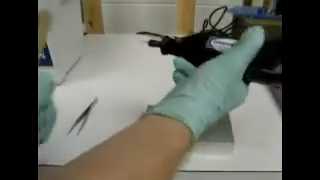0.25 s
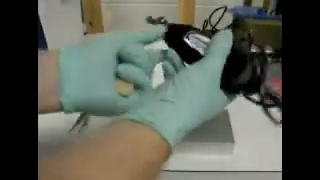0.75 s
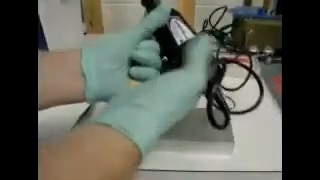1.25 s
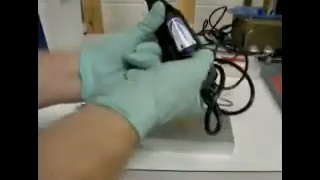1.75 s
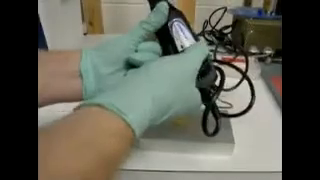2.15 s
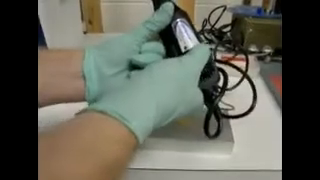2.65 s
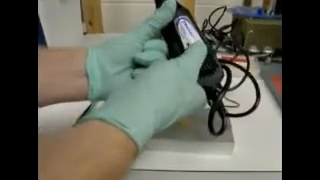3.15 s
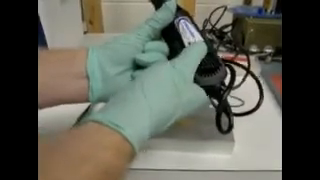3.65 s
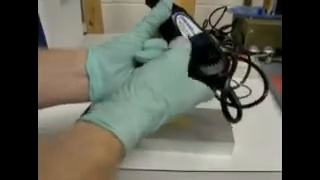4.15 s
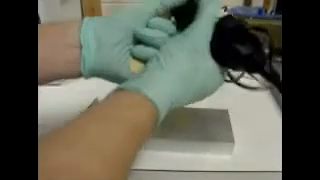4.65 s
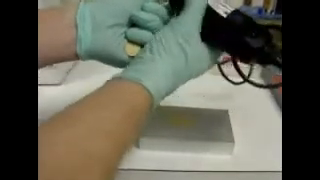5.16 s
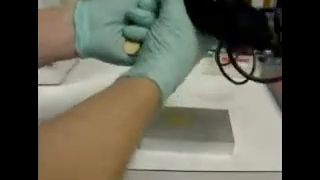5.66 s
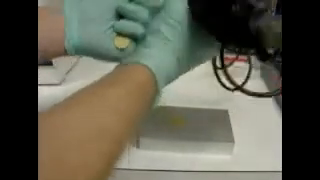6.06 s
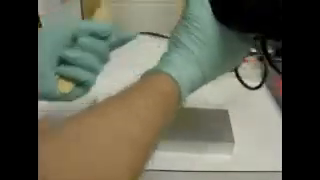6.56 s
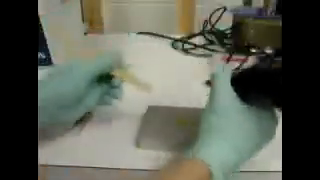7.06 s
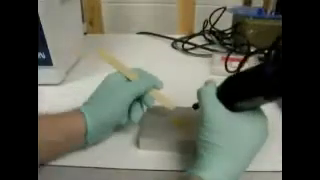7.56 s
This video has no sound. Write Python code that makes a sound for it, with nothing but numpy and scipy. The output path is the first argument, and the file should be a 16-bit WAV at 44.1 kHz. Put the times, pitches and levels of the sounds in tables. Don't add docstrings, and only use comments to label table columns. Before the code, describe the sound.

In a quiet ventilated lab, gloves creak, a switch clicks, and a small electric motor creeps up before screaming to full speed, its hiss shifting.

```python
import sys
import numpy as np
from scipy import signal
from scipy.fft import rfft, irfft, next_fast_len
from scipy.io import wavfile
from scipy.ndimage import uniform_filter1d, map_coordinates

SR = 44100
rng = np.random.default_rng(int(sys.argv[2]) if len(sys.argv) > 2 else 0)


def undo_db(level):
    steps = np.asarray(level, float) / 20
    return 10 ** steps


def digitize_waveform(pressure):
    field = np.atleast_2d(pressure).T
    bounded = np.clip(field, -1, 1)
    quanta = np.round(bounded * 32767).astype(np.int16)
    wavfile.write(sys.argv[1], SR, quanta)


N = 343980
T = np.arange(N) / SR
DIAL_S, MAINS_RIPPLE_HZ = 3.0578, 120
FLUTTER_DB = 1.7


def unit(x):
    return x / np.sqrt(np.mean(x ** 2) + 1e-20)


def along(points, hz):
    f, v = np.transpose(points)
    return np.interp(np.log(hz + 1), np.log(f + 1), v)


def curves(rows):
    s, *cols = np.transpose(rows)
    return [np.interp(T, s, c) for c in cols]


def wobble(rate):
    coarse = T[::64]
    knots = rng.standard_normal(int(N * rate / SR) + 4)
    return np.interp(T, coarse, map_coordinates(knots, [coarse * rate]))


def swell(middle, half):
    return np.exp(-((T - middle) / half) ** 2)


def rise(start, lag):
    return 1 - np.exp(-np.maximum(T - start, 0) / lag)


def ramp(start, length):
    return np.clip((T - start) / length, 0, 1)


def filtered(x, response):
    m = next_fast_len(len(x) + SR // 2)
    return irfft(rfft(x, m) * response(np.fft.rfftfreq(m, 1 / SR)), m)[:len(x)]


def resonance(f, hz, width):
    return 1j * f * width / (hz * hz - f * f + 1j * f * width)


def body(modes, floor):
    return lambda f: floor + sum((-1) ** k * undo_db(db) * resonance(f, c, w)
                                 for k, (c, w, db) in enumerate(modes))


def open_top(spectrum):
    return lambda hz: undo_db(along(spectrum[:-2], hz))


def patchy(patchy_db, grit_db):
    grit = np.repeat(rng.exponential(size=N // 32 + 1), 32)[:N]
    grains = rng.standard_normal(N) * undo_db(grit_db * grit)
    z = signal.stft(grains, nperseg=512)[2]

    def blur(bins, frames):
        smeared = uniform_filter1d(rng.standard_normal(z.shape), bins, 0)
        return unit(uniform_filter1d(smeared, frames, 1))

    field = blur(bins=8, frames=12) + 1.2 * blur(bins=5, frames=60)
    return signal.istft(z * undo_db(patchy_db * unit(field)), nperseg=512)[1][:N]


def ventilation():
    # (time [s], level [dB])
    room_level = [
        (0.0, -62),
        (.46, -65),
        (3.06, -63.5),
        (3.2, -67.5),
        (4.1, -74.5),
        (4.4, -70.5),
        (5.45, -71.5),
        (6.0, -77),
        (6.12, -73.5),
        (7.8, -72.5),
    ]
    # (frequency [Hz], density [dB per Hz])
    room_colour = [(8.8, -56.5), (15, -2), (54, 2.5), (152, -8.5), (187, -8.5), (387, -10.5), (618, -19),
                   (844, -14.5), (1040, -20), (1250, -23), (1990, -23.5), (2150, -25.5), (7500, -45.5),
                   (9750, -78), (16500, -120)]
    # (frequency [Hz], level under the rumble [dB])
    hum_tones = [(120, -8), (193, -10)]
    rumble = unit(filtered(rng.standard_normal(N), open_top(room_colour)))
    hum = sum(undo_db(db + 0.97 * wobble(3.6)) * np.sin(2 * np.pi * hz * T + .5 * wobble(13))
              for hz, db in hum_tones)
    return undo_db(curves(room_level)[0] - 0.66) * (rumble + hum)


def gloves():
    # (middle [s], half length [s], bright level [dB], dull level [dB])
    strokes = [(0.224, 0.044, -68, -73), (.27, 0.07, -60, -79), (0.5, 0.044, -57, -69.5),
               (0.41, 0.044, -65.5, -80), (0.669, 0.06, -61.5, -83), (0.932, 0.016, -64, -63),
               (0.905, 0.093, -64.5, -92), (1.064, 0.11, -62.5, -78), (1.306, 0.041, -67.5, -81),
               (1.381, 0.011, -68, -82), (1.591, 0.054, -66, -70.5), (1.818, 0.051, -69.5, -85)]
    # (frequency [Hz], density [dB per Hz])
    bright_colour = [(1800, -53), (3000, -15.5), (4600, -6), (5600, -3.5), (6600, -1.5), (7300, -4.5),
                     (7800, -7), (10000, -40), (17000, -120)]
    dull_colour = [(600, -40), (1000, -8), (2000, -4), (3200, -1.5), (4500, -5), (6000, -25), (9000, -60)]
    shifting_db, resting_db, dull_db = -74, -78, -82
    fidget = undo_db(np.interp(T, [1.3, 2.05], [shifting_db, resting_db])) * rise(-0.034, 0.085)
    bright_gain = fidget + sum(undo_db(db) * swell(s, half) for s, half, db, _ in strokes)
    dull_gain = undo_db(dull_db) + sum(undo_db(db) * swell(s, half) for s, half, _, db in strokes)
    bright = unit(filtered(patchy(patchy_db=1.5, grit_db=1.5), open_top(bright_colour)))
    dull = unit(filtered(patchy(patchy_db=.8, grit_db=1.5), lambda f: undo_db(along(dull_colour, f))))
    return (bright_gain * bright + dull_gain * dull) * np.clip((2.65 - T) / 0.071, 0, 1)


def clicks():
    # (time [s], peak [dB], centre [Hz], decay t60 [s])
    snap_events = [(.2013, -48, 7000, .003), (.2195, -42, 5600, .01), (.2213, -35, 5600, .006),
                   (.2590, -30, 6000, .005), (.2603, -32, 6300, .007), (.2626, -31, 5200, .005),
                   (.2646, -33, 6600, .007), (.2654, -32, 2400, .005), (.3308, -53, 2300, .005),
                   (1.3485, -51, 3800, .008), (1.385, -57, 5000, .008), (1.518, -59, 5500, .008),
                   (2.5137, -58, 7500, .004), (2.5352, -36, 7000, .01), (2.5365, -46, 3500, .008),
                   (3.0772, -26, 6500, .007)]
    # (frequency [Hz], width [Hz], level [dB])
    switch_modes = [(1180, 260, -12), (3350, 290, -2.5), (5400, 1100, -2.5), (6800, 640, 3.5)]
    switch_s, switch_db = 2.5303, -24
    out, t = np.zeros(N), np.arange(SR // 10) / SR

    def place(sound, s, db):
        out[round(s * SR):][:len(t)] += undo_db(db) * sound / np.abs(sound).max()

    for s, db, hz, t60 in snap_events:
        puff = rng.standard_normal(len(t)) * undo_db(-60 * t / max(t60, .003)) * (1 - np.exp(-t / 0.00046))
        puff = filtered(puff, lambda f: resonance(f, hz, .3 * hz) ** 2 + .2 * resonance(f, hz, 1.3 * hz))
        place(puff, s, db)
    crack = undo_db(-60 * t / 0.0049) * (1 - np.exp(-(t / 0.001) ** 3))
    rattle = undo_db(-36 - 60 * t / 0.15) * (t > .0015)
    noise = (crack + rattle) * rng.standard_normal(len(t))
    place(filtered(noise, body(switch_modes, floor=0.04)), switch_s, switch_db)
    return out


def lab(x):
    # (frequency [Hz], t60 [s])
    decay = [(300, 0.11), (3000, 0.12), (8000, 0.082)]
    hz, t, z = signal.stft(rng.standard_normal(SR // 3), SR, nperseg=256)
    tail = signal.istft(z * undo_db(-60 * t / along(decay, hz)[:, None]), SR, nperseg=256)[1]
    return signal.fftconvolve(np.pad(x, (150, 0)), tail / np.linalg.norm(tail))[:N]


def speed():
    start_s, creep_hz, creep_lag_s = 2.5464, 206.8, .3447
    kick_hz, kick_lag_s = 139.5, .0973
    climb_hz, climb_lag_s, warm_hz_per_s = 175.92, .4947, 8.639
    climb = kick_hz * rise(DIAL_S, kick_lag_s) + climb_hz * rise(DIAL_S, climb_lag_s)
    climb += warm_hz_per_s * np.maximum(T - DIAL_S, 0)
    return uniform_filter1d(creep_hz * rise(start_s, creep_lag_s) + climb, SR // 80)


def ripple():
    chopped = 1 - rise(DIAL_S - .01, .04)

    def depth(low_db, dial_db, speed_db, lag_s):
        return np.where(T < DIAL_S, low_db, dial_db + (speed_db - dial_db) * rise(DIAL_S, lag_s))

    tone_db = depth(11, 11, 2.2, 1.6)
    noise_db = depth(6.5, 2.5, .35, .3)
    cycle = (T * MAINS_RIPPLE_HZ - .86) % 1
    burst = 2 * np.exp(-cycle / .25) * (1 - np.exp(-cycle / .015)) - 1
    throb = np.cos(2 * np.pi * (cycle + 0.2))
    shape = chopped * burst + (1 - chopped) * throb
    cycle_len = round(SR / MAINS_RIPPLE_HZ)

    def even(gain):
        return gain / np.sqrt(uniform_filter1d(gain * gain, cycle_len * 2))

    drag = tone_db * .0006 * np.sin(2 * np.pi * (cycle + .2))
    return even(undo_db(tone_db * shape)), even(undo_db(noise_db * shape)), drag


def shaft_tone(turns, order, shift=0):
    angle = order * (turns + shift + 0.01 * wobble(25))
    return np.sqrt(2) * np.sin(2 * np.pi * angle + 7 * rng.random())


def slot_tones(rate, turns, octaves, gain, drag, close_db, turn_db, aim_db):
    # (multiple of shaft, level at running current [dB], added by chopped current [dB])
    slot_orders = [(8, -58, -8), (16, -57, 1), (24, -61, 6), (32, -72, 15)]
    # (frequency [Hz], width [Hz], level [dB])
    slot_path = [(2420, 570, -0.2), (3340, 180, -1.7), (4700, 980, -1.5), (6060, 210, -2.5),
                 (6650, 280, -1.5)]
    surging = ramp(3.05, .01)
    surge_db = 17.5 * (1 - rise(DIAL_S, 0.56))
    hands_db = (1.3 * close_db - 0.4 * turn_db) * rise(2.9, .3)
    current_db = surging * (surge_db + hands_db + aim_db)
    current_db += (1 - surging) * 7 * octaves

    def path(f):
        power = sum(np.abs(undo_db(db) * resonance(f, c, w)) ** 2 for c, w, db in slot_path)
        return np.sqrt(.12 ** 2 + power) / (1 + (f / 6940) ** 30) / (1 + (1900 / (f + 1)) ** 9)

    whine = np.zeros(N)
    for order, db, chop_db in slot_orders:
        level = undo_db(db + (1 - surging) * chop_db + current_db + FLUTTER_DB * wobble(40))
        casing_gain = np.interp(T, T[::64], path(order * rate[::64]))
        whine += level * casing_gain * gain * shaft_tone(turns, order, drag)
    return whine


def fan_blades(rate, turns):
    vent_hz, hz = 5900, 18 * rate
    vents = 1 / (1 + (vent_hz / (hz + 1)) ** 14) / (1 + (hz / 8600) ** 50)
    return undo_db(-45 + FLUTTER_DB * wobble(40)) * vents * shaft_tone(turns, 18)


def barrel(rate, turns, close_db, turn_db, aim_db):
    level = undo_db(-57 + aim_db + 2.7 * close_db - 1.0 * turn_db + 1.2 * wobble(14))
    return level * np.abs(resonance(3 * rate, 1560, 500)) * shaft_tone(turns, 3)


def brushes_and_air(turns, octaves, full, noise_gain, close_db, turn_db):
    # (frequency [Hz], density [dB per Hz])
    air_colour = [(150, -60.5), (250, -27.5), (699, -19), (1100, -8.5), (1330, -11), (1490, -7),
                  (1620, -2.5), (2070, -8.5), (2220, -9.5), (2490, -11), (2840, -10), (4000, -14.5),
                  (5240, -8.5), (6490, -2.5), (7600, -6.5), (9880, -37), (16700, -120)]
    # (frequency [Hz], width [Hz], level [dB])
    casing = [(1190, 130, -7.5), (2500, 370, 3.5), (3450, 88, 2.5), (4830, 170, -19.5), (6400, 200, 1),
              (7300, 260, -2)]
    # (upper edge [Hz], level [dB], share of closeness [dB/dB], share of turn [dB/dB])
    zones = [(2040, 0.57, 1.64, -0.55), (5400, 1.6, 0.71, 1.4), (22100, -0.1, 0.59, -0.059)]
    rub = patchy(patchy_db=1.68, grit_db=0.5) * undo_db(0.74 * np.cos(2 * np.pi * turns)) * noise_gain
    firings = np.diff(np.floor(T * MAINS_RIPPLE_HZ - .87), prepend=-1) > 0
    kicks = firings * undo_db(1.5 * rng.standard_normal(N))
    creeping = unit(filtered(rub, body(casing, floor=0.52)))
    creeping += undo_db(-15) * unit(filtered(kicks, body(casing, floor=0.55)))
    creeping = unit(filtered(creeping, lambda f: resonance(f, 3670, 10000) ** 2))
    air = (1 - full) * undo_db(-50 + 7.5 * octaves) * creeping
    source, below = unit(filtered(rub, open_top(air_colour))), 0
    for edge_hz, db, near, turned in zones:
        upto = filtered(source, lambda f: np.clip(np.log(edge_hz / (f + 1)) / 0.053 + .5, 0, 1))
        air += full * undo_db(-44 + db + near * close_db + turned * turn_db) * (upto - below)
        below = upto
    return air


def faint_orders(turns):
    # (multiple of shaft, middle [s], half length [s], level [dB])
    appearances = [(1, 3.36, .1, -61), (1, 4.15, .6, -72), (1, 6.55, .35, -78), (1, 7.4, .55, -71),
                   (18, 2.75, .06, -71), (9, 6.2, .12, -68), (9, 6.7, .2, -61), (9, 7.15, .25, -59.5),
                   (9, 7.6, .2, -64), (2, 4.75, 0.8, -68), (2, 6.85, 1, -71), (10, 4.36, 0.15, -61),
                   (12, 7.4, .3, -67), (12, 6.5, 0.56, -61), (4, 7.2, .25, -72), (10, 6.2, .3, -70),
                   (6, 7.3, 0.46, -66)]
    out = np.zeros(N)
    for order in sorted({row[0] for row in appearances}):
        gain = sum(undo_db(db) * swell(s, half) for k, s, half, db in appearances if k == order)
        out += gain * undo_db(FLUTTER_DB * wobble(14)) * shaft_tone(turns, order)
    return out


def cavities():
    # (middle [s], half length [s], frequency [Hz], width [Hz], level [dB])
    openings = [
        (3.328, 0.058, 1760, 247, -72),
        (4.353, 0.17, 6400, 714, -55),
        (5.411, 0.36, 6550, 700, -48.5),
        (6.202, 0.13, 6500, 590, -55),
        (7.1, 0.12, 6880, 610, -53.5),
        (7.15, 0.66, 1193, 302, -63),
        (7.5, 0.11, 7350, 795, -51),
        (7.68, 0.22, 2500, 350, -59.5),
        (7.483, 0.11, 5400, 910, -52.5),
    ]
    draught = patchy(patchy_db=-1.5, grit_db=1.5)
    return sum(undo_db(db) * swell(s, half) * unit(filtered(draught, lambda f: resonance(f, hz, w) ** 2))
               for s, half, hz, w, db in openings)


def motor():
    # (time [s], closeness [dB], vents turned to the camera [dB])
    grip = [(3.12, -2, 3), (3.2, -0.5, -0.5), (3.36, 2, 0.5), (3.52, -3, -2.5), (4.07, -0.5, -1.5),
            (4.4, 4, 1), (4.51, 1.3, 1.2), (4.62, 2.5, 1.5), (5.4, 1.5, 0), (5.78, 0, -0.5),
            (5.94, -5, -3.5), (6.05, 0.4, -.6), (6.27, 1.5, -0.1), (6.45, -1, -0.7), (7.1, 0.6, 0.8),
            (7.28, -2, -0.5), (7.68, -2, 1.5), (7.8, -0.5, 3)]
    # (middle [s], half length [s], slot tones [dB], third order [dB])
    swings = [
        (4.305, 0.18, 0, -2.5),
        (5.457, 0.29, 8, 0.6),
        (5.93, 0.3, 3.5, 0),
        (6.6, 0.092, 0.5, -3.5),
        (7.28, 0.11, -3, -11),
        (7.747, 0.13, -5, -1),
    ]
    rate = speed()
    turns = np.cumsum(rate) / SR
    slot_gain, noise_gain, drag = ripple()
    close_db, turn_db = curves(grip)
    aim_slot_db, aim_third_db = sum(swell(s, half) * np.array(db)[:, None] for s, half, *db in swings)
    running, full = ramp(2.55, 0.024), ramp(3.05, .03)
    octaves = np.log2((rate + 1) / 160)
    tones = slot_tones(rate, turns, octaves, slot_gain, drag, close_db, turn_db, aim_slot_db)
    tones += fan_blades(rate, turns)
    tones += full * barrel(rate, turns, close_db, turn_db, aim_third_db)
    tones += 1.6 * filtered(tones, lambda f: resonance(f, 2500, 130))
    air = brushes_and_air(turns, octaves, full, noise_gain, close_db, turn_db)
    return running * (tones + air + faint_orders(turns) + cavities())


def scene():
    snaps = clicks()
    return (ventilation() + gloves() + snaps + undo_db(-19) * lab(snaps) + motor())[None]


def band_limit(x):
    return signal.sosfilt(signal.butter(12, 8980, fs=SR, output="sos"), x)


def record(dry):
    # (frequency [Hz], gain [dB])
    before_sampling = [(7500, 0), (8000, -4), (8400, -8), (8800, -15), (9400, -45)]
    after_sampling = [(7600, 0.5), (8000, -2), (8400, -10.5), (8700, -19.5), (8950, -45.5), (9080, -71)]
    camera_rate_hz = 16000
    heard = filtered(dry[0], lambda hz: undo_db(along(before_sampling, hz)))
    mirrored = heard * (1 + 2 * np.cos(2 * np.pi * camera_rate_hz * T))
    played = filtered(mirrored, lambda hz: undo_db(along(after_sampling, hz)))
    return band_limit(played[None])


dry = scene()
out = record(dry)
digitize_waveform(out)
```